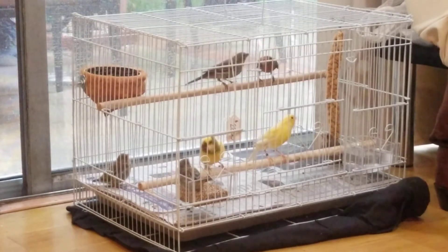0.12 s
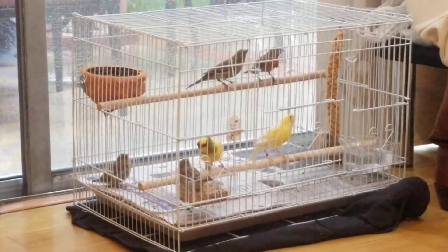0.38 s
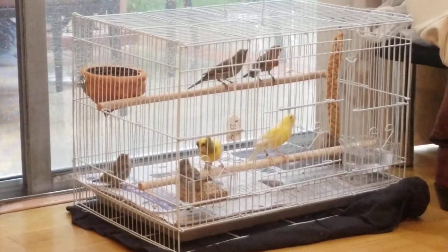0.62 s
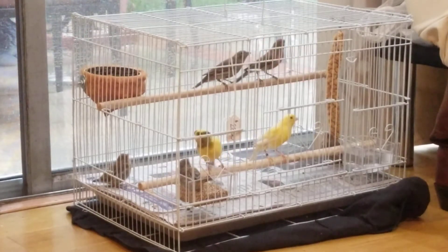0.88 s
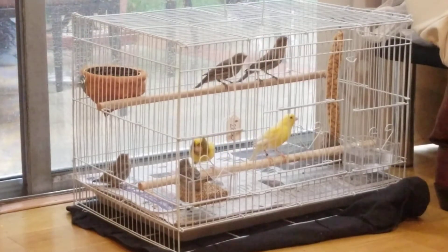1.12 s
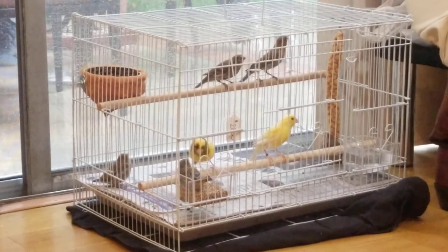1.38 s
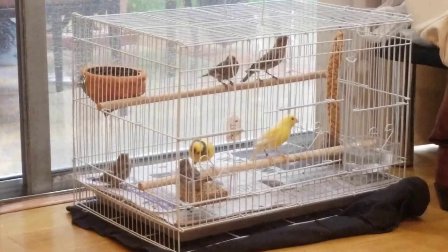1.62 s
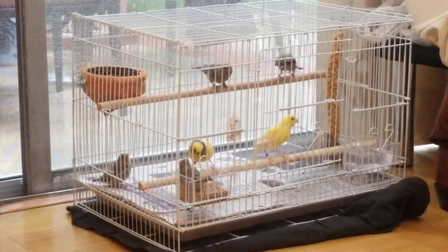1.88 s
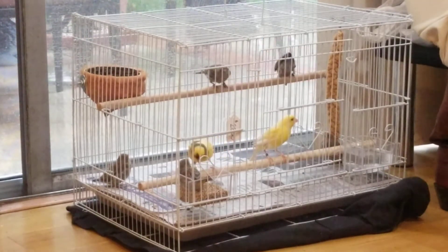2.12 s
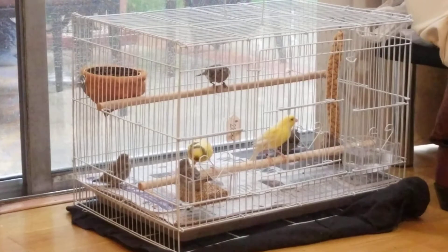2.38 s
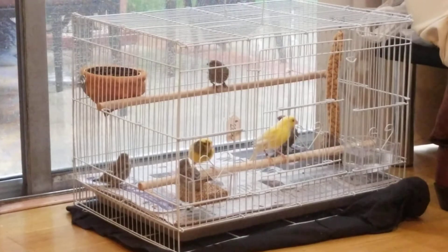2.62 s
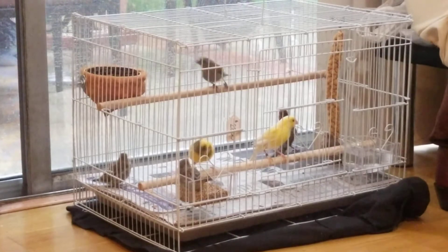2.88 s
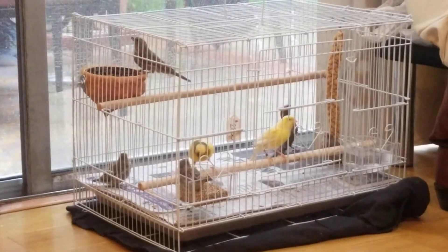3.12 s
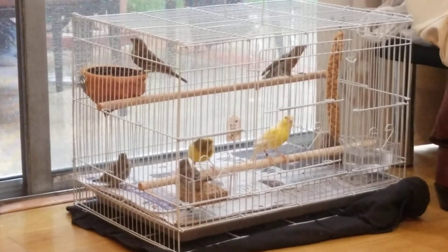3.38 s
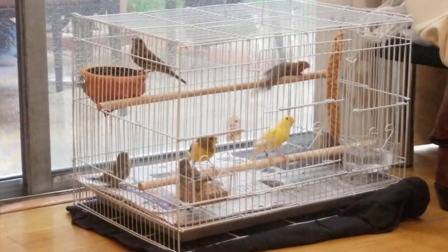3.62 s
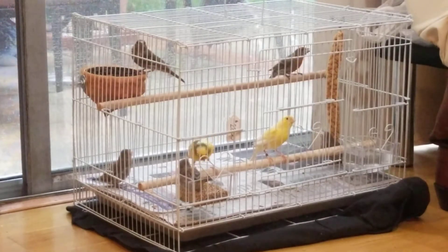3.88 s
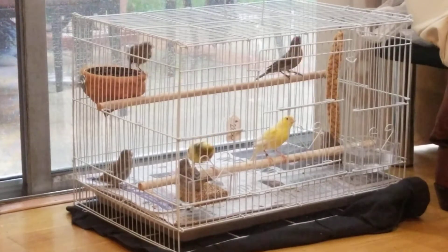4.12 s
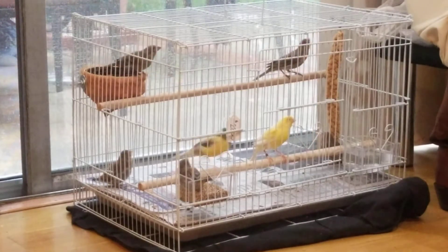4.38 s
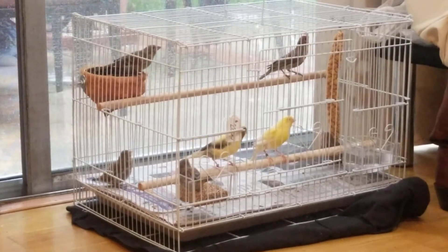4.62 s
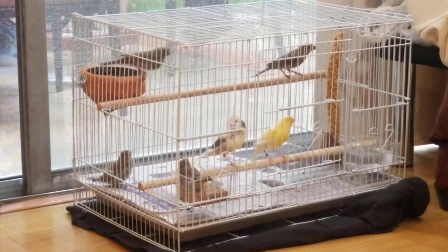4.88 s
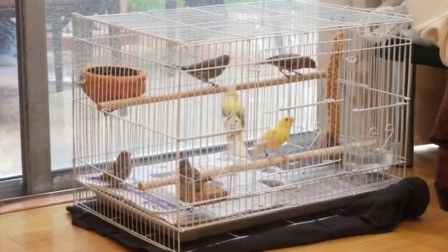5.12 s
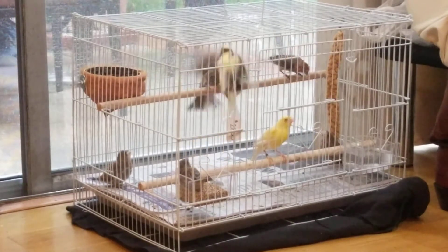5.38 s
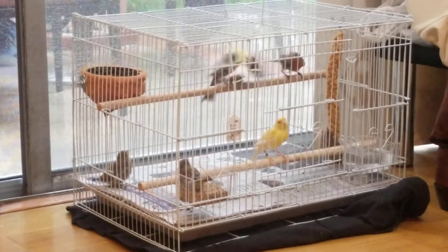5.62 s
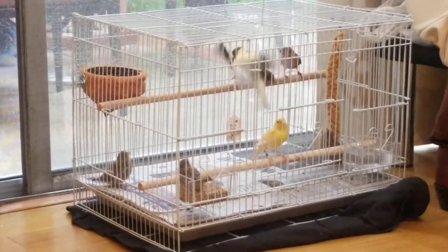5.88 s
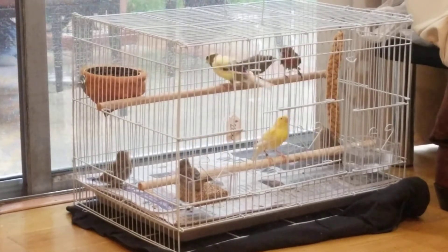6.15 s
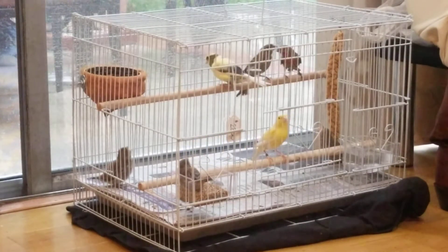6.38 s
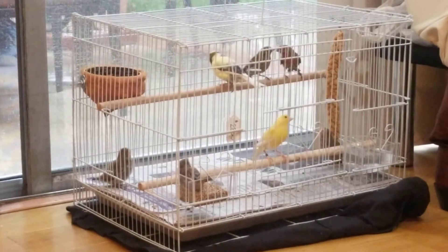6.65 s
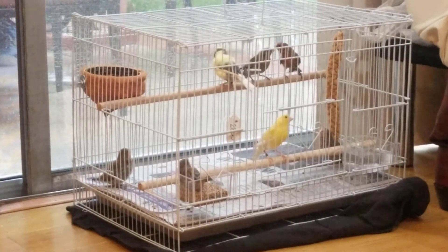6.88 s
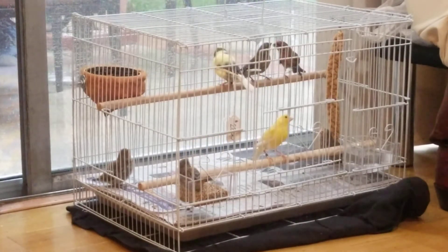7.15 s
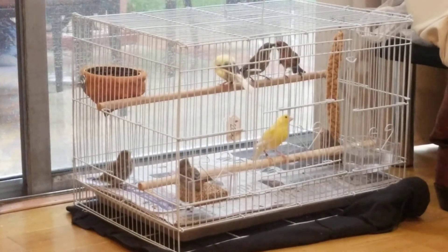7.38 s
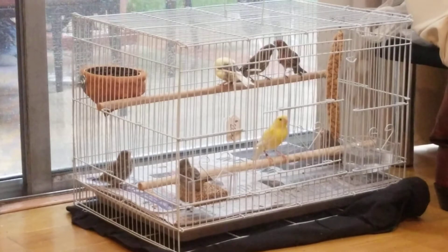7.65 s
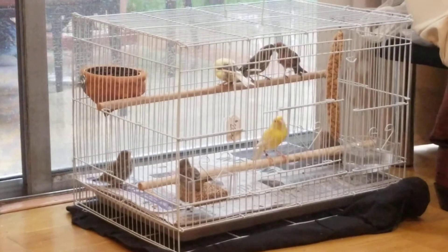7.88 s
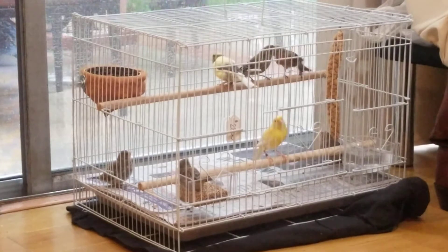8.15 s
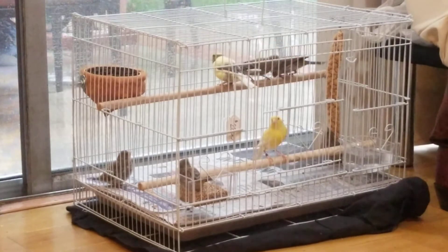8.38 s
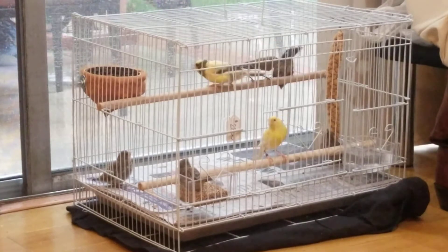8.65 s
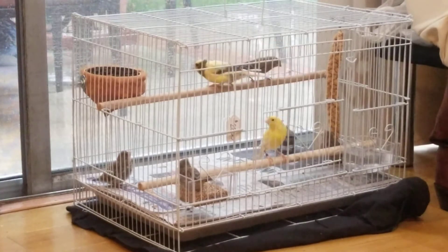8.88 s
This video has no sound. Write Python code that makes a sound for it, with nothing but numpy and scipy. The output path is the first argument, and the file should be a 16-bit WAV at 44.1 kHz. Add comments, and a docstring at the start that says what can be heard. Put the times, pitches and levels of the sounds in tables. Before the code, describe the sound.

A steady, soft low ventilation hum with faint hiss fills a live, hard-floored room throughout. Small caged birds are heard through a bright half-second echo, slightly left. Faint flutters open; at 0.5 s a short low whistle drops and holds, with a small perch tap at 0.8. Faint falling peeps come at 1.4 to 2.5, with a clear wooden knock at 2.3. At 3.3 to 3.6 soft notes mix with light hops and fluttering. Strong two-toned chirps sound at 3.75 and 3.97, a quick cluster at 4.9, another chirp at 5.2. The loudest wing flutter comes around 5.4, then a nasal call climbs at 5.85 and bright chirps follow at 6.1 and 6.3, the last the strongest. A dull thud falls at 6.65. Weaker peeps come at 7.4 and around 8; soft flutter and a sharp double perch knock at 8.7, and a faint final peep near 9.

```python
"""Small caged birds chirp briefly in a live, hard-floored room; perches knock, wings flutter, ventilation hums.
Calls: near sines on gliding pitches with overtones and breath noise, smeared into a bright tail by the room.
Hops: decaying perch modes with rattle and claw ticks. Wings: noise in three bands, pulsed by the wing beat.
Thuds: low noise bursts. Hum: shaped stereo noise, lifted at the low modes of the room."""
import sys
import numpy as np
from scipy import signal
from scipy.fft import rfft, irfft, next_fast_len
from scipy.io import wavfile
from scipy.ndimage import uniform_filter1d

SR = 44100
rng = np.random.default_rng(int(sys.argv[2]) if len(sys.argv) > 2 else 0)


def dump(signal):
    """Clip the signal to [-1, 1] and save it as 16-bit WAV at the path in sys.argv[1]."""
    limited = np.clip(np.atleast_2d(signal).T, -1, 1)
    pcm = np.round(limited * 32767).astype(np.int16)
    wavfile.write(sys.argv[1], SR, pcm)


def undo_db(level):
    """Turn decibels back into plain size, where 20 dB means ten times bigger."""
    steps = np.asarray(level, float) / 20
    return 10 ** steps


N = 397341


def read(points, hz):
    """Reads a spectrum on a log-frequency axis."""
    f, value = np.transpose(points)
    return np.interp(np.log(hz + 1), np.log(f + 1), value)


def bumps(modes, hz):
    """Sum in dB of bell-shaped resonances."""
    return sum(db / (1 + (2 * (hz - f) / width) ** 2) for f, width, db in modes)


def evened(x):
    """Scales to rms 1."""
    return x / np.sqrt(np.mean(x ** 2) + 1e-20)


def add(mix, s, sound):
    """Mixes a sound in at time s."""
    part = mix[round(s * SR):][:len(sound)]
    part += sound[:len(part)]


def shaped(x, db_at):
    """Filters x by a gain in dB over frequency."""
    size = next_fast_len(x.shape[-1] + 2048)
    gain = undo_db(db_at(np.fft.rfftfreq(size, 1 / SR)))
    return irfft(rfft(x, size) * gain, size)[..., :x.shape[-1]]


def swelled(u, first_db, loudest, last_db):
    """Level in dB along a sound, u from 0 to 1: it swells, peaks at the share loudest, and fades."""
    rise_curve, fade_curve = 1.74, 1.14  # power laws
    rise_db = first_db * abs(1 - u / loudest) ** rise_curve
    fade_db = last_db * abs((u - loudest) / (1 - loudest)) ** fade_curve
    return np.where(u < loudest, rise_db, fade_db)


def hum(patchy_db=1.0, swell_db=0.5, deep_hz=90, whine_db=8, whine_width_hz=220, rms_db=-50.5):
    """Air noise, lifted at the low modes of the room, with faint patches and a slow swell."""
    # spectrum of the air noise: (frequency [Hz], relative density [dB per Hz])
    air_spectrum = [(12, -24.5), (20, -7.5), (65, -8), (101, -1.5), (149, -9), (202, 1.5), (233, -6),
                    (418, -12), (454, -13.5), (494, -8.5), (1390, -26), (12600, -39.5), (15700, -40)]
    # room modes the hum excites: (frequency [Hz], width [Hz], gain [dB])
    room_modes = [(97.7, 17, 6.5), (134, 46, 8), (195.8, 6.7, 12.5), (221.5, 26, 7.5), (273.5, 18.5, 9.5),
                  (355.4, 90, 7.5), (418.7, 7.7, 10.5)]
    # similarity of the two sides: (frequency [Hz], left-right likeness [0 to 1])
    likeness = [(60, 0.99), (180, 0.97), (550, 0.89), (1650, 0.21), (4970, 0.66), (15000, 0.36)]
    # stereo balance: (frequency [Hz], left over right [dB])
    balance = [(60, -1), (240, 1.5), (950, 2.5), (3770, 2.5), (15000, 5)]
    # swells of the deepest part; its mean is taken out: (time [s], relative level [dB])
    rumble = [(0.0, -73.5), (1.78, -74), (1.98, -73.5), (6.47, -70.5), (6.87, -64), (6.97, -69), (8.9, -68),
              (9.0, -66)]
    # faint narrow hiss near the top: (time [s], frequency [Hz])
    whine_track = [(0, 13000), (3, 12700), (9, 12500)]

    frames, hz = N // 1024 + 5, np.fft.rfftfreq(4096, 1 / SR)[:, None]
    t = np.arange(frames) * 1024 / SR
    a, b, c, d, patches = rng.standard_normal((frames, len(hz), 5)).T
    patches = evened(uniform_filter1d(uniform_filter1d(patches, size=40, axis=0), size=4, axis=1))
    swell = evened(uniform_filter1d(rng.standard_normal(frames), size=12))
    deep_db = np.interp(t, *np.transpose(rumble))
    deep_db = (deep_db - deep_db.mean()) / (1 + (hz / deep_hz) ** 2)
    whine_hz = np.interp(t, *np.transpose(whine_track))
    colour_db = read(air_spectrum, hz) + bumps(room_modes, hz) + bumps([(whine_hz, whine_width_hz, whine_db)], hz)
    same, left = read(likeness, hz), a + 1j * b
    right = same * left + np.sqrt(1 - same ** 2) * (c + 1j * d)
    z = np.array([left, right]) * undo_db(colour_db + deep_db + patchy_db * patches + swell_db * swell)
    z *= undo_db(np.array([.5, -.5])[:, None, None] * read(balance, hz))
    return undo_db(rms_db) * evened(signal.istft(z, nperseg=4096, noverlap=3072)[1][:, :N])


def thud(db, hz, length_s, width=0.27):
    """A dull burst of noise around one low pitch; width is a share of that pitch."""
    size = round(length_s * SR)
    f = np.fft.rfftfreq(size, 1 / SR)
    band = 1 / (1 + ((f - hz) / (width * hz)) ** 4)
    burst = irfft(rfft(rng.standard_normal(size)) * band, size)
    return undo_db(db) * evened(burst) * signal.windows.tukey(size, .6)


def wings(beats_per_s=24, flap_db=3.5, below_db=-10, above_db=-10, uneven_db=2.5):
    """Feathers beat the air: a mid rush, a hiss and a low push, pulsing unevenly with the wing beat."""
    # flutters: (start [s], length [s], level before the mix [dB], centre of the rush [Hz],
    # feather hiss [dB re rush], push of air [dB re rush])
    flutters = [(0.0, 0.18, -71, 1510, -10.5, 6), (0.341, 0.18, -72.5, 1460, -21, 12.5),
                (0.445, 0.18, -70, 2180, -4.5, 7), (0.816, 0.3, -66, 1610, -1.5, 3),
                (2.377, 0.27, -71.5, 1680, 1.5, -11), (2.877, 0.47, -92, 1600, 15.5, 2),
                (3.112, 0.41, -72, 1920, -21, 2.5), (3.474, 0.41, -66.5, 1840, 5.5, 0.5),
                (4.37, 0.17, -82, 2100, 10, -9), (4.65, 0.24, -92.5, 1390, 22, 0),
                (4.812, 0.54, -76.5, 1780, 13, 8), (5.344, 0.11, -63.5, 2180, 6, 7.5),
                (5.396, 0.29, -59, 2500, -19, -4), (5.65, 0.31, -72, 2750, 6.5, -10),
                (6.656, 0.15, -70.5, 1987, 3.5, 9), (7.545, 0.16, -71.5, 1400, -6.5, 8.5),
                (7.867, 0.41, -74.5, 1640, -6, 8), (8.138, .16, -75.5, 1560, 8, 13),
                (8.6, 0.48, -87, 1650, 15, 12.5), (8.818, 0.38, -69.5, 1830, -10.5, -10)]
    # feather hiss: (frequency [Hz], relative density [dB per Hz])
    hiss_spectrum = [(2000, -37.5), (4000, -10.5), (8000, -16), (12000, -18.5), (16000, -22)]
    # push of air: (frequency [Hz], relative density [dB per Hz])
    push_spectrum = [(100, -1), (260, 2), (550, 1), (850, 0), (1400, -33.5)]
    swell = (-1.3, 0.21, -14.5)  # first dB, loudest share of the length, last dB

    frames, hz = N // 128 + 5, np.fft.rfftfreq(512, 1 / SR)[:, None]
    t = np.arange(frames) * 128 / SR
    power = np.zeros((len(hz), frames))
    for s, length_s, db, centre_hz, hiss_db, push_db in flutters:
        on = (t >= s) & (t < s + length_s)
        level_db = db + swelled((t[on] - s) / length_s, *swell)
        octaves = np.log2((hz + 1) / centre_hz)
        rush_db = np.where(octaves > 0, above_db, below_db) * abs(octaves)  # falls away on both sides
        hiss = undo_db(hiss_db + read(hiss_spectrum, hz))
        push = undo_db(push_db + read(push_spectrum, hz))
        beat_db = flap_db * np.sin(2 * np.pi * (beats_per_s * t[on] + rng.random()))
        envelope = undo_db(level_db + beat_db) * signal.windows.tukey(on.sum(), .3)
        power[:, on] += (undo_db(rush_db) ** 2 + hiss ** 2 + push ** 2) * envelope ** 2
    a, b = rng.standard_normal((frames, len(hz), 2)).T
    uneven = evened(uniform_filter1d(rng.standard_normal(frames), size=8))
    z = (a + 1j * b) * np.sqrt(power) * undo_db(uneven_db * uneven) / 3  # about rms 1 for the rush alone
    return signal.istft(z, nperseg=512, noverlap=384)[1][:N]


def hop(db, tick_db, bright_db, tick_s=0.0028, second_db=-3, second_ms=6.5,
        rattle_db=-18, rattle_s=0.01, rise_s=0.00046):
    """Two feet strike the perch a few ms apart: it rings briefly and rattles in its seat, claws tick."""
    # perch modes, detuned at each hop: (nominal frequency [Hz], relative level [dB])
    perch_modes = [(590, -0.5), (760, -1.5), (900, 5), (1050, 7.5), (1270, -1), (1480, 4), (1800, 5.5),
                   (2150, -11), (2500, -1), (3100, -2), (3900, -9), (5400, -13), (7700, -12)]
    size, cycles = 4000, 15  # gripped wood loses 60 dB in about this many cycles
    t, ring = np.arange(size) / SR, np.zeros(size)
    for f, mode_db in perch_modes:
        decay_db = mode_db + bright_db * np.log2(f / 1000) - 60 * t * f / cycles
        ring += undo_db(decay_db) * np.sin(2 * np.pi * (f * rng.uniform(0.88, 1.04) * t + rng.random()))
    rattle = undo_db(rattle_db) * np.exp(-t / rattle_s) * rng.standard_normal(size) * (rng.random(size) < .15)
    ring = ring * (1 - np.exp(-t / rise_s))  # soft toes load the wood gradually
    ring = ring + signal.fftconvolve(ring, rattle)[:size]
    tick = undo_db(tick_db) * np.exp(-t / tick_s) * rng.standard_normal(size)
    foot = ring / abs(ring).max() + tick
    second_foot = np.append(np.zeros(round(second_ms * SR / 1000)), foot)[:size]
    return undo_db(db) * (foot + undo_db(second_db) * second_foot)


def movements():
    """Flutters through the resonant cage wires, with hops and thuds through the floor added."""
    # cage wires answer the flutters: (frequency [Hz], width [Hz], gain [dB])
    wire_modes = [(1650, 45, 0.5), (2500, 100, -3.5), (4940, 1500, 0.5), (7700, 1200, 4.5), (10790, 450, 1)]
    # feet landing: (time [s], ring peak before the mix [dB], claw tick [dB re ring], brightness [dB per octave])
    landings = [(0.359, -82, -29, 19), (0.84, -48, -10, -3), (2.332, -36, -18, 1), (3.245, -50.5, -1, 2),
                (3.496, -53.5, -15, 16), (3.565, -57.5, -36, 2), (5.368, -64.5, -13, -8),
                (6.658, -64, -5, 24), (8.659, -56, -4.5, -21), (8.739, -53, -5, 6),
                (8.775, -34.5, -17.5, 7)]
    # soft thuds: (time [s], level before the mix [dB], pitch [Hz], length [s])
    floor_thuds = [(0.379, -53, 265, 0.1), (6.66, -50, 133, 0.1), (7.55, -56, 175, 0.058),
                   (8.514, -57, 242, 0.097)]
    cage = shaped(wings(), lambda f: bumps(wire_modes, f))
    for s, *strike in landings:
        add(cage, s, hop(*strike))
    for s, *blow in floor_thuds:
        add(cage, s, thud(*blow))
    return cage


def note(rows, quiver, higher_db=-3, breath_db=-8, edge_s=0.00054, throb_db=3):
    """A near sine glides along its pitch; overtones and breath come from the uneven closing of the syrinx."""
    # colour of overtones and breath: (frequency [Hz], gain [dB])
    beak_colour = [(1500, -13), (3500, -1.5), (4600, -3.5), (6000, -1.5), (7500, -5), (9500, -1.5),
                   (12000, -2), (14000, -9), (16500, 0.5)]
    s, *columns = np.transpose(rows)
    t = np.arange(s[0], s[-1], 1 / SR)
    hz, db, over_db = (np.interp(t, s, c) for c in columns)
    wobble, breath, throb = rng.standard_normal((3, len(t)))
    throb = evened(uniform_filter1d(uniform_filter1d(throb, size=120), size=120))
    db = db + throb_db * throb  # the note stutters
    wobble = evened(uniform_filter1d(wobble, size=70))
    hz = uniform_filter1d(hz, size=150) * (1 + quiver * wobble)
    phase = 2 * np.pi * np.cumsum(hz) / SR
    overtones = sum(undo_db((k - 2) * higher_db) * np.sin(k * phase) * (k * hz < SR / 2.5) for k in range(2, 7))
    harsh = shaped(undo_db(over_db) * (overtones + undo_db(breath_db) * breath), lambda f: read(beak_colour, f))
    edges = np.clip(np.minimum(t - s[0], s[-1] - t) / edge_s, 0, 1)
    return s[0], np.sqrt(2) * undo_db(db) * edges * (np.sin(phase) + harsh)


def slide(s, length_s, first_hz, last_hz, db, over_db, swell, bend=1, hold=0):
    """Rows of a note whose pitch relaxes from first to last after a hold; bend over 1 moves early, then settles."""
    u = np.linspace(0, 1, 20)
    left = np.clip((1 - u) / (1 - hold), 0, 1) ** bend
    hz = last_hz + (first_hz - last_hz) * left
    return np.transpose([s + length_s * u, hz, db + swelled(u, *swell), over_db + 0 * u])


def bent(s, length_s, first_hz, mid_hz, last_hz, db, over_db=-18, over_db_per_octave=7):
    """Rows of a note bending through mid_hz halfway, mostly up and down; overtones, over_db at 4 kHz, follow pitch."""
    u = np.linspace(0, 1, 20)
    hz = mid_hz + (np.where(u < .5, first_hz, last_hz) - mid_hz) * (2 * u - 1) ** 2
    level_db = db + swelled(u, -7, 0.56, -1)
    return np.transpose([s + length_s * u, hz, level_db, over_db + over_db_per_octave * np.log2(hz / 4000)])


def calls():
    """Every note as (start, sound): single voices of the syrinx, and duets of both its sides at once."""
    # levels are before the mix, overtones re the fundamental
    # a long nasal call dips and climbs: (time [s], pitch [Hz], level [dB], overtones [dB])
    nasal_call = [(5.826, 2088, -63, 11), (5.845, 2544, -34.5, 3.5), (5.865, 1976, -59, 22.5),
                  (5.89, 1895, -54.5, 18), (5.925, 2132, -41.5, 7), (5.95, 2662, -30.5, -12.5),
                  (5.975, 3527, -27, -20.5), (6.005, 3727, -29.5, -22)]
    # falling whistles: (start [s], length [s], first pitch [Hz], last pitch [Hz], level [dB], overtones [dB])
    falling = [(0.453, 0.079, 7930, 6600, -69, -24), (1.414, 0.062, 8900, 5140, -53, -19),
               (1.988, 0.065, 7800, 5950, -64, -5), (2.478, 0.041, 9200, 5800, -55.5, -19),
               (3.38, 0.051, 6840, 5620, -47.5, -23), (3.587, .055, 6430, 6010, -43.5, -16.5),
               (3.635, 0.026, 5430, 5260, -54, -40), (3.643, 0.058, 8400, 7330, -45.5, -30),
               (4.858, 0.024, 3080, 2920, -56, -6), (4.909, 0.013, 8800, 8740, -43.5, -34),
               (4.924, 0.028, 8400, 6700, -44, -32.5), (5.015, 0.051, 8180, 7400, -49, -11.5),
               (5.016, .042, 6590, 6090, -42.5, -19), (5.673, 0.08, 8620, 6390, -46, -16),
               (6.042, 0.08, 8600, 6260, -45, -23), (6.483, 0.051, 6570, 5940, -53, -10),
               (7.923, 0.068, 8350, 5200, -50, -15), (7.949, 0.056, 7630, 6100, -54, -23.5),
               (7.996, 0.012, 4490, 4165, -44.5, -21)]
    # low notes, drop then hold: (start [s], length [s], first pitch [Hz], held pitch [Hz], level [dB], overtones [dB])
    hooks = [(0.486, 0.061, 3880, 3012, -36.5, -24.5), (3.277, 0.07, 3110, 2231, -48, -7.5),
             (4.89, 0.066, 4390, 2950, -38.5, -17)]
    # bent whistles: (start [s], length [s], first pitch [Hz], middle pitch [Hz], last pitch [Hz], level [dB])
    bends = [(0.462, 0.039, 2900, 3740, 3570, -57), (0.499, 0.058, 3390, 3900, 3450, -49.5),
             (3.41, .035, 3840, 4045, 3620, -47.5), (3.592, .03, 6600, 7700, 7000, -52),
             (4.855, .047, 7700, 7850, 7900, -57), (4.876, 0.035, 5500, 6540, 6550, -49),
             (4.899, .055, 3586, 3960, 3370, -50), (7.425, 0.043, 3460, 3940, 3330, -52.5),
             (7.435, 0.023, 7700, 8520, 8030, -47.5), (8.245, 0.01, 8770, 8700, 9500, -58),
             (8.952, 0.039, 7000, 8270, 7060, -50)]
    # two voices: (start [s], length [s], low voice end [Hz], its level [dB], high voice pitch [Hz], its level [dB])
    duets = [(1.595, 0.084, 5700, -54, 7320, -56), (3.751, 0.078, 6380, -33, 7900, -31.5),
             (3.968, 0.095, 6420, -32.5, 7900, -31), (5.202, 0.063, 6300, -34, 7320, -32),
             (6.116, 0.072, 6220, -31.5, 7500, -33), (6.301, 0.066, 6480, -29.5, 7550, -23.5),
             (7.36, 0.1, 5550, -46, 7250, -46), (8.146, 0.069, 5920, -40.5, 7400, -45.5)]
    # swells: first dB, loudest share of the length, last dB
    slide_swell, hook_swell = (-11.5, .5, -3.5), (-9.5, 0.83, -27.5)
    low_swell, high_swell = (-27.5, 0.3, -13.5), (-15, 0.72, -15)
    # rms pitch quiver, share of the pitch; bent_buzz is for a 4 kHz middle pitch, higher ones are smoother
    smooth, buzzy, hook_buzz, bent_buzz = .014, .04, .017, .07

    out = [note(nasal_call, smooth, higher_db=-22, breath_db=-9)]
    out += [note(slide(*row, slide_swell, bend=2.2), smooth) for row in falling]
    out += [note(slide(*row, hook_swell, bend=4.8), hook_buzz, higher_db=-7) for row in hooks]
    out += [note(bent(*row), bent_buzz * (4000 / row[3]) ** 2) for row in bends]
    for s, length_s, low_hz, low_db, high_hz, high_db in duets:
        low = slide(s, length_s, 7110, low_hz, low_db, -14, low_swell, bend=2.9, hold=.25)
        high = slide(s, length_s, high_hz, high_hz, high_db, -26, high_swell)  # level pitch
        out += [note(low, smooth), note(high, buzzy)]
    return out


def room(x, shared=0.65, gap_s=.003, early_db=6, early_s=0.033):
    """Sparse taps of random sign dying band by band, partly the same at both microphone ports."""
    # reverberation: (frequency [Hz], t60 [s])
    decay_times = [(300, 0.36), (1300, 0.63), (3000, 0.44), (5000, 0.68), (8000, 0.48), (13000, 0.47)]
    taps = np.zeros((3, SR))
    slots = np.arange(round(gap_s * SR), SR - 20, 20)
    at = slots + rng.integers(0, 20, (3, len(slots)))
    np.put_along_axis(taps, at, rng.choice([-1., 1.], at.shape), 1)
    hz, t, z = signal.stft(taps, SR, nperseg=128)
    near_db = early_db * np.exp(-t / early_s)  # floor and glass close to the cage answer first and loudest
    decay_db = near_db - 60 * t / read(decay_times, hz)[:, None]
    tail = signal.istft(z * undo_db(decay_db), SR, nperseg=128)[1]
    tail = np.sqrt(shared) * tail[2] + np.sqrt(1 - shared) * tail[:2]
    return signal.fftconvolve(x[None], tail / np.linalg.norm(tail[0]), axes=1)[:, :N]


def scene():
    """Birds heard mostly through the room; notes are dealt in turn, in list order, to three sets of echoes."""
    # side the calls come from: (time [s], left over right [dB])
    seats = [(.5, 2.5), (1.4, 5.5), (3.5, 4), (3.9, 6), (4.899, 5), (5.25, 5.5), (5.9, 3.5), (6.3, 5),
             (7.4, 5), (8.1, 4.5), (9.0, 9.5)]
    cage, birds = movements(), np.zeros((3, N))
    for k, call in enumerate(calls()):
        add(birds[k % 3], *call)
    lean_db = np.interp(np.arange(N) / SR, *np.transpose(seats))
    clatter = undo_db(1.0) * cage + undo_db(3.0) * room(cage)
    voices = undo_db(-7.0) * birds.sum(0) + undo_db(-4.0) * sum(room(b) for b in birds)
    return hum() + clatter * undo_db([[1.5], [-1.5]]) + voices * undo_db(np.array([[.5], [-.5]]) * lean_db)


def roll_off(x):
    """The treble ends steeply here."""
    return signal.sosfilt(signal.butter(12, 15840, fs=SR, output="sos"), x)


def record(dry):
    """Resonances of the microphone port colour the treble."""
    # port resonances: (frequency [Hz], width [Hz], gain [dB])
    port_modes = [(7900, 730, 3.5), (12860, 3000, 5.5)]
    mix = shaped(dry, lambda f: bumps(port_modes, f))
    return roll_off(mix)


dry = scene()
out = record(dry)
dump(out)
```